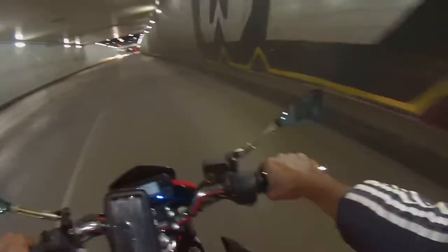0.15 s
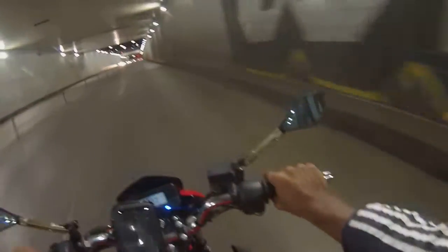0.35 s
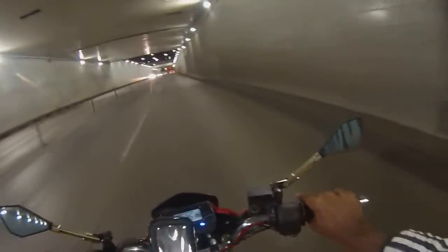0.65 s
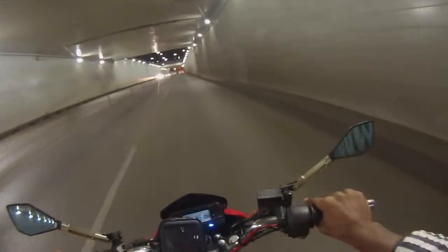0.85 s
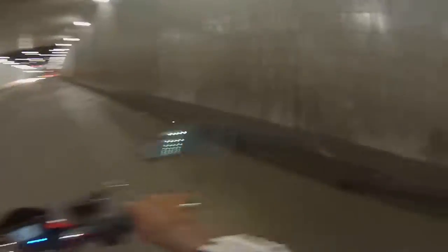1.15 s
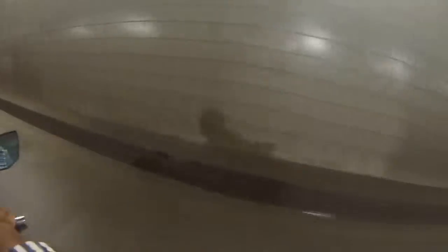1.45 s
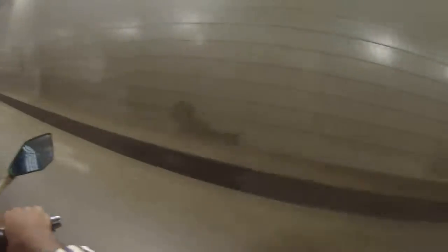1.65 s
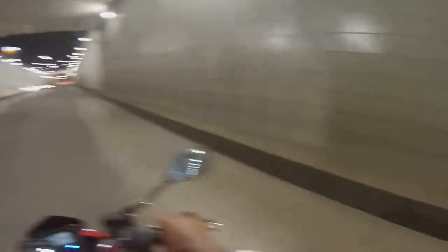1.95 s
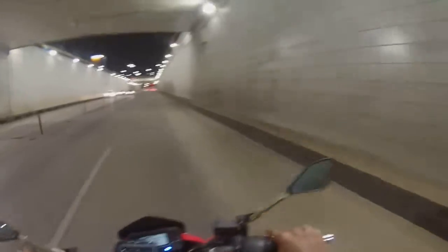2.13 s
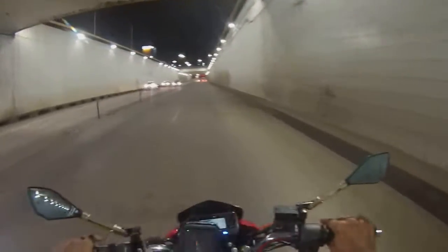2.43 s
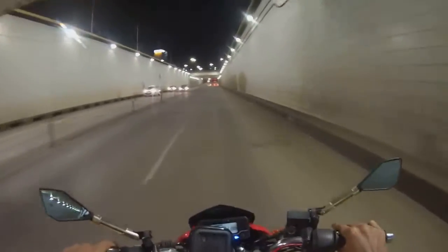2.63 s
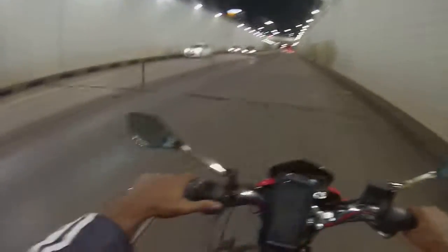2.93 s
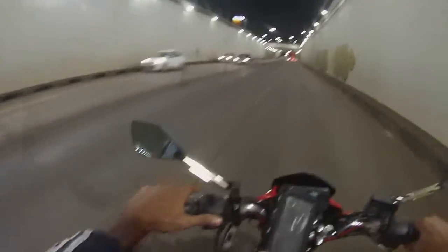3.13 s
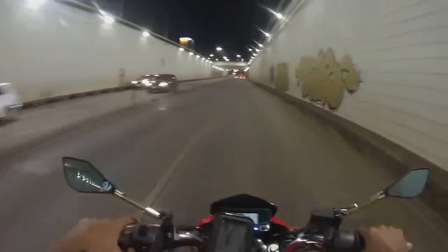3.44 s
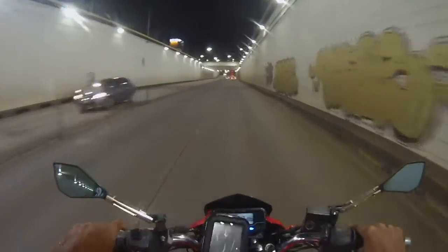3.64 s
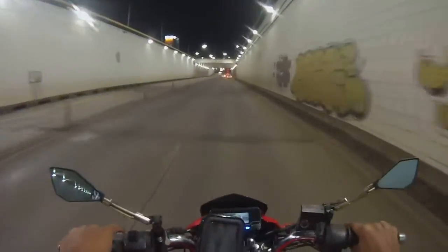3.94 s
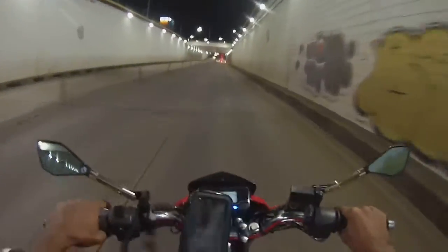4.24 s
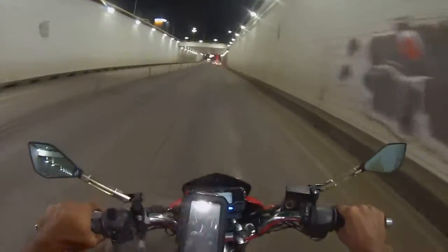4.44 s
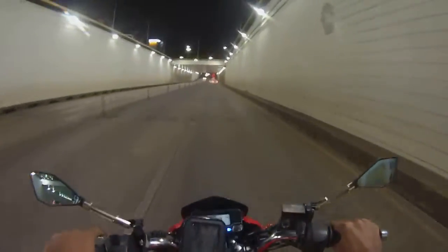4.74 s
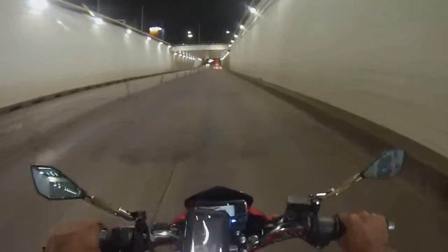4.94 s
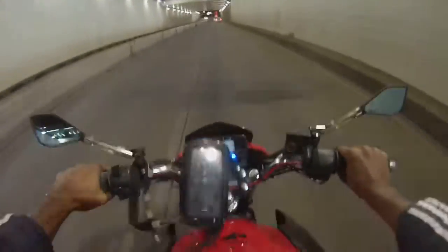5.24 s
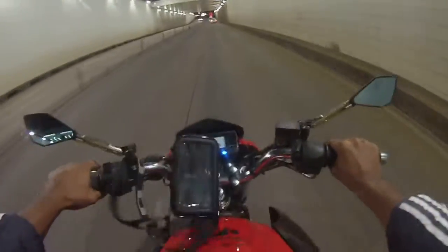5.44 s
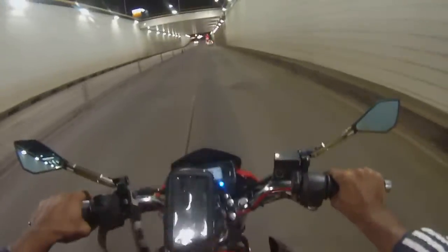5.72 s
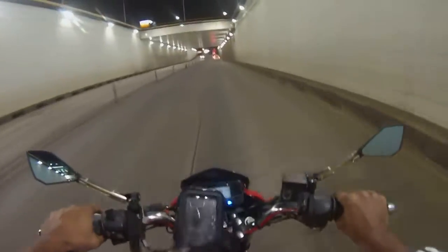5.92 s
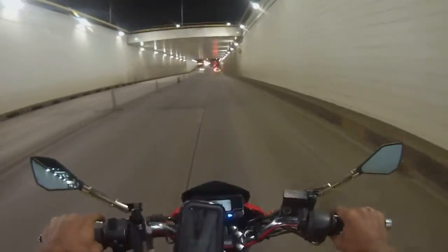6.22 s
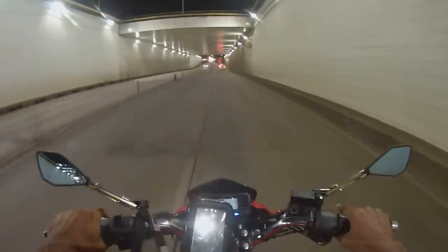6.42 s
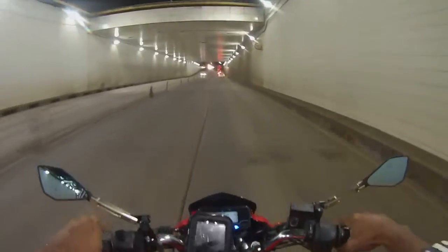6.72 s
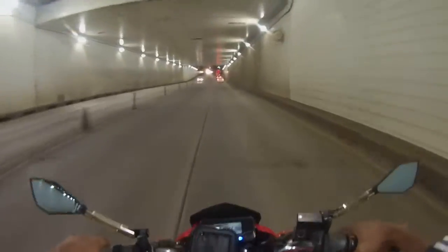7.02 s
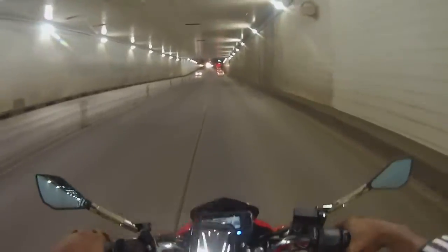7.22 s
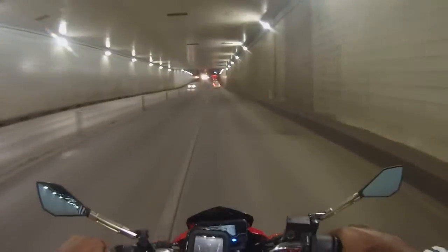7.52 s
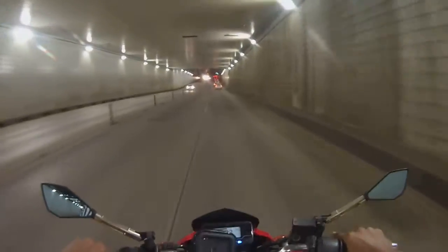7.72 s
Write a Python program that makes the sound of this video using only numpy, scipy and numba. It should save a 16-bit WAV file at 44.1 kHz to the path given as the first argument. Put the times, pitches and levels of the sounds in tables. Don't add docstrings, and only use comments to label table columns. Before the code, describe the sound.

Close, muffled motorcycle ride between tunnel walls: first a buzzing rev that swells and sinks within two seconds, then a low chugging cruise with uneven firings and smeared wall echoes. Low wind roar surges and flutters, covering the engine at times. Faint metallic rattle and gear whine fade as the throttle eases. Loud beats make the level dip with tiny clicks.

```python
import sys
import numpy as np
from scipy import signal
from scipy.io import wavfile
from scipy.ndimage import uniform_filter1d
from numba import njit

SR = 44100
rng = np.random.default_rng(int(sys.argv[2]) if len(sys.argv) > 2 else 0)


def int16_out(signal):
    q = np.round(np.clip(np.atleast_2d(signal).T, -1, 1) * 32767)
    wavfile.write(sys.argv[1], SR, q.astype(np.int16))


def boost(x):
    u = np.asarray(x, float) / 20
    return 10 ** u


N = 347067

# start_s, firing_hz
FIRING_RATE = [(0.0, 48.1), (0.33, 39.5), (0.46, 49.6), (0.65, 68.3), (0.76, 77.45), (0.81, 79.0),
               (1.29, 79.4), (1.4, 76.2), (1.6, 66.35), (1.71, 59.8), (1.93, 41.6), (1.99, 43.2),
               (2.15, 43.0), (2.26, 40.4), (5.5, 45.25), (6.7, 46.6), (7.55, 44.5), (7.87, 44.75)]
# start_s, stair_click_db, slow_duck_db
STRONG_FIRINGS = [(0.0001, -42, -3), (0.0672, -40.5, -1.5), (0.1556, -44, -3), (0.391, -46, 0.1),
                  (0.9025, -44, -1.6), (1.9041, -43, -6.5), (2.2727, -44.5, -2.7), (2.6894, -39, -6),
                  (2.855, -41.5, -7), (3.523, -40, -0.3), (3.7145, -40.5, -5), (4.0639, -43, -4.5),
                  (4.1828, -45.5, -3.5), (4.5627, -42.5, -3), (4.8466, -41.5, -1), (5.1354, -38.5, -0.3),
                  (5.2254, -35, 6), (5.4285, -36.5, 5.5), (5.511, -55, -3.5), (5.7526, -43, 0),
                  (5.8433, -43, 3.7), (5.973, -41.5, 5.3), (6.1921, -43.5, -1.5), (6.6663, -43.5, -4.5),
                  (6.8655, -42.5, -2.5), (7.0429, -45.5, -1.7), (7.132, -42, -5), (7.3065, -46.5, 1.5),
                  (7.839, -40.5, -3), (7.868, -59, -1.6)]


def curve(table):
    s, *columns = np.transpose(table)
    return [np.interp(np.arange(N) / SR, s, column) for column in columns]


def level(x, db):
    return x * boost(db) / np.sqrt(np.mean(x ** 2))


@njit
def svf(x, hz, width_hz):
    y, band, low = np.empty(len(x)), 0., 0.
    for i in range(len(x)):
        g, k = np.tan(np.pi * hz[i] / SR), width_hz / hz[i]
        v = (band + g * (x[i] - low)) / (1 + g * (g + k))
        band = 2 * v - band
        low = low + 2 * g * v
        y[i] = k * v
    return y


def modes(x, table):
    total = 0
    for hz, width_hz, db in table:
        centre_hz = np.full(len(x), 1. * hz)
        once = svf(x, centre_hz, 1.276 * width_hz)
        total = total + boost(db) * svf(once, centre_hz, 1.276 * width_hz)
    return total


def walk(rate_hz):
    hold = int(SR / rate_hz)
    held = np.repeat(rng.standard_normal(N // hold + 1), hold)
    return uniform_filter1d(uniform_filter1d(held, hold), hold)[:N]


def wind(roar_db, buffet_db, rush_db):
    # hz, db_per_hz
    turbulence = [(12, -44), (20, -14), (43, -34.5), (81, -4), (162, 1.5), (195, -1.5), (264, -1),
                  (430, 1.5), (473, -4.5), (560, -22), (801, -52.5), (1610, -68), (1800, -50), (2340, -80),
                  (3960, -120)]
    hz_at, db_at = np.transpose(turbulence)
    roar, rush, gust = 0, 0, walk(6)
    for hz in 50 * 2 ** np.arange(0, 4.8, 1 / 3):
        db = np.interp(np.log(hz), np.log(hz_at), db_at) + 0.86 * gust + 2.9 * walk(15)
        band = boost(db) * modes(rng.standard_normal(N), [(hz, hz / 5.13, 0)])
        if hz < 560:
            roar = roar + band
        else:
            rush = rush + band
    buffet_band = signal.butter(2, [22, 70], "band", fs=SR, output="sos")
    buffet = signal.sosfilt(buffet_band, rng.standard_normal(N)) * boost(3.1 * gust)
    rush = rush * boost(1.3 * gust + .7 * walk(8))
    return level(roar, roar_db) + level(buffet, buffet_db) + level(rush, rush_db)


def thumps():
    thump_s, thump_per_duck = 0.036, 1.5
    t = np.arange(N) / SR
    swell_db = np.zeros(N)
    for s, _, duck_db in STRONG_FIRINGS:
        swell_db -= thump_per_duck * min(duck_db, 0) * np.exp(-((t - s + thump_s / 2) / thump_s) ** 2)
    return swell_db


def mechanics(turns, buzz_db, rattle_db):
    # start_s, level_db
    gear_whine = [
        (0, -22),
        (2, -18),
        (2.4, -14.5),
        (4, -8.5),
        (6.6, -11),
        (6.9, -24),
        (7.87, -25),
    ]
    # hz, width_hz, level_db
    casing = [(1176, 1400, 1.5), (1550, 390, -3), (1970, 360, -2.5), (2180, 120, -15)]
    # hz, width_hz, level_db
    valve_gear = [(4130, 970, 5), (4550, 2300, 3.5), (6140, 3000, -7.5), (7700, 100, -7), (9400, 5800, -19),
                  (11040, 850, -11.5)]
    puff = boost(1.5 * np.cos(2 * np.pi * turns - .6) + 1.9 * walk(50))
    taps = boost(2.0 * rng.exponential(size=N)) * (rng.random(N) < .3) * rng.standard_normal(N)
    revved = boost(0.58 * (curve(FIRING_RATE)[0] - 85))
    loaded = boost(curve(gear_whine)[0])
    buzz = level(modes(puff * rng.standard_normal(N), casing), 0)
    buzz = buzz + revved * level(modes(taps, [(2170, 48, 0)]), -8)
    rattle = level(modes(puff * taps, valve_gear), 0)
    high_revs = modes(taps, [(4300, 290, -2.5), (4800, 410, -3), (8500, 130, -11.5)])
    rattle = rattle + revved * level(high_revs, -1.1)
    whine = loaded * level(modes(puff * taps, [(5310, 200, 0)]), -2) * boost(3 * walk(10))
    return buzz * boost(buzz_db) + (rattle + whine) * boost(rattle_db)


def through_case(x):
    hollow_hz, top_hz = (2370, 3770), 12800
    x = x - 0.84 * svf(x, np.full(N, 1800.), 300.0)
    hollow = signal.sosfilt(signal.butter(2, hollow_hz, "bandstop", fs=SR, output="sos"), x)
    return signal.sosfilt(signal.butter(8, top_hz, fs=SR, output="sos"), hollow + boost(-18.5) * x)


def walls(x):
    t60_s, nearest_s = 0.56, .012
    t = np.arange(int(SR * .8)) / SR
    tails = rng.standard_normal((2, len(t))) * boost(-60 * t / t60_s) * (t > nearest_s)
    fade = 1.5 * walk(4)
    wet = np.cos(fade) * signal.fftconvolve(x, tails[0])[:N]
    wet = wet + np.sin(fade) * signal.fftconvolve(x, tails[1])[:N]
    return np.interp(np.arange(N) - 30 * walk(3), np.arange(N), wet)


def exhaust(pulses):
    # hz, width_hz, level_db
    pipe = [(94, 37, -7), (189.5, 91, -3.5), (291.2, 67, -2.5), (428.8, 95, 1)]
    case_hz = 446
    return signal.sosfilt(signal.butter(4, case_hz, fs=SR, output="sos"), modes(pulses, pipe))


def unevenness(turns):
    wall_db = 4
    fired = np.flatnonzero(np.diff(np.floor(turns)))
    pulses = np.zeros(N)
    pulses[fired] = rng.standard_normal(len(fired))
    direct = exhaust(pulses)
    return level(level(direct, 0) + level(walls(direct), wall_db), 0)


def crank():
    turns = np.cumsum(curve(FIRING_RATE)[0]) / SR
    at = (np.array(STRONG_FIRINGS)[:, 0] * SR).astype(int)
    pull = np.zeros((2, N))
    pull[:, at] = np.cos(2 * np.pi * turns[at]), np.sin(2 * np.pi * turns[at])
    pull = uniform_filter1d(uniform_filter1d(pull, size=SR), size=SR)
    phase = np.unwrap(np.arctan2(pull[1], pull[0]))
    return turns - uniform_filter1d(phase, size=SR // 2) / (2 * np.pi)


def note(turns, load_db, boom_db, pull_db):
    # hz, level_db
    upper = [(40, -54), (80, -26), (230, 0.5), (340, -12), (395, -8), (455, 3.5), (495, -4.5), (540, -15.5),
             (650, -23.5), (850, -34), (1200, -62.5)]
    # hz, level_db
    lower = [(85, -27.5), (130, -25.5), (170, -21), (210, -20.5), (240, -24), (270, -24), (320, -25.5),
             (400, -24.5)]
    boom_hz, boom_width_hz = 165.6, 32
    pull_hz, pull_width_hz = 210, 26
    upper_db, upper_per_load = -28.5, 1.3
    even_db_per_hz, second_per_load = 0.1538, 1.4
    hz, out = curve(FIRING_RATE)[0], 0
    for k in range(1, 17):
        if 2 <= k <= 5:
            db = np.interp(k * hz, *np.transpose(lower))
            db = db + boom_db * np.exp(-((k * hz - boom_hz) / boom_width_hz) ** 2)
            db = db + pull_db * np.exp(-((k * hz - pull_hz) / pull_width_hz) ** 2)
        else:
            db = np.interp(k * hz, *np.transpose(upper))
            db = db + (k > 1) * (upper_db + upper_per_load * load_db)
        db = db + ((k == 4) + (k == 6) / 2) * even_db_per_hz * (hz - 44)
        db = db + (k == 2) * second_per_load * load_db
        lag = .08 * k * k + .2 * walk(4)
        waver_db = 1.1 * walk(6) + (k > 5) * 1.2 * walk(1.5)
        out = out + np.sqrt(2) * boost(db + waver_db) * np.cos(2 * np.pi * k * turns - lag)
    return out


def bangs(rest):
    swing_s, swing_hz = .0016, 270
    t = np.arange(-400, 400) / SR
    s, click_db, _ = np.transpose(STRONG_FIRINGS)
    at = ((s + .0008) * SR).astype(int)
    places, hits = np.zeros((2, N))
    places[at] = 1
    hits[at] = .45 * boost(.35 * (click_db + 50)) * rng.choice([1, 1, -1], len(s))
    bell = np.exp(-(t / swing_s) ** 2)
    share = np.clip(signal.fftconvolve(places, .8 * bell, "same"), 0, 1)
    swing = bell * np.cos(2 * np.pi * swing_hz * t + 0.53)
    return rest * (1 - share) + signal.fftconvolve(hits, swing, "same")


def scene():
    # start_s, engine_load_db, roof_and_wall_boom_db, throttle_pull_db, gust_db
    ride = [(0, -1, 4.5, -8, -1), (.3, -1, 5.5, -8, -5), (.45, 2.5, -3, -5.5, -2.5),
            (1.25, 4, -3.5, -4, -8.5), (1.6, 0, -5, 1.5, -9), (1.82, -3, 12, -12, -10),
            (2.05, 1, 1.1, -3, 1.5), (2.25, -1, -3, 3.5, -3.5), (2.7, 0.9, -5, 3.3, 9),
            (3.2, -4, -8.5, 1.5, 9), (4.3, -1.9, -7, 1.7, 2), (4.8, 2, -7, 0.5, -1.9),
            (5.2, 2.5, 0.5, -2.1, 3), (5.65, -0.5, -2, -5.5, -5.5), (6.1, 0, -3.3, -2, 0.5),
            (6.7, -0.1, -2.5, 0.5, 6), (6.95, -3.5, 7, -11.5, 3), (7.87, -5, 0.5, -13, 3.5)]
    uneven_db, roar_db, buffet_db, rush_db, buzz_db, rattle_db = -21.5, -18.5, -32, -43, -52, -61
    rattle_lag_s = .22
    load_db, boom_db, pull_db, gust_db = curve(ride)
    turns = crank()
    revs_hz = curve(FIRING_RATE)[0] - 44
    engine = note(turns, load_db, boom_db, pull_db) + unevenness(turns) * boost(uneven_db + .3 * load_db)
    roar_db = roar_db - 0.064 * revs_hz + .15 * gust_db
    thump_db = thumps()
    air = wind(roar_db, buffet_db + gust_db + thump_db, rush_db + .7 * gust_db + .3 * thump_db)
    late_load_db = np.interp(np.arange(N) - rattle_lag_s * SR, np.arange(N), load_db)
    rattle_db = rattle_db + 0.64 * late_load_db + .06 * revs_hz
    low = bangs(engine + air)
    return (low + through_case(mechanics(turns, buzz_db + 0.72 * load_db, rattle_db)))[None]


def gain_control(x):
    trip_level, high_level = .45, 0.55
    duck_wait_s, duck_fall_s, duck_back_s = .007, 0.0041, 0.075
    stairs, stair_samples, stair_back_s = 4, 16, 0.078
    catch_per_s = 40

    def back(v, tau_s):
        return signal.lfilter([1], [1, -np.exp(-1 / (tau_s * SR))], v)

    s, click_db, duck_db = np.transpose(STRONG_FIRINGS)
    at = (s * SR).astype(int) + 14
    first, ducks, steps = np.zeros((3, N))
    ducks[np.minimum(at + int(duck_wait_s * SR), N - 1)] = duck_db
    slow_db = back(back(ducks, duck_back_s), duck_fall_s) / (duck_fall_s * SR)
    swing = abs(x) * boost(slow_db)
    high = signal.find_peaks(swing, height=high_level, distance=SR // 70)[0]
    first[high] = np.minimum(0.15 + 2.4 * (swing[high] - high_level), .33)
    chance = rng.random(N // 800 + 1).repeat(800)[:N]
    first *= chance < (catch_per_s / curve(FIRING_RATE)[0]) ** 2
    for start in at:
        first[start - 200:start + 200] = 0
    first[at] = .29 * boost(click_db + 48.0)
    for k in range(stairs):
        steps -= np.roll(first * (.47 + rng.random(N)) * .67 ** k, k * stair_samples)
    steps[signal.find_peaks(swing, height=trip_level)[0]] -= .15
    steps = uniform_filter1d(steps, size=2)
    gain_db = back(steps, stair_back_s) + slow_db
    return gain_db - gain_db.mean()


def band_limit(x):
    return signal.sosfilt(signal.butter(12, 14900, fs=SR, output="sos"), x)


def record(dry):
    x = np.tanh(0.82 * dry * boost(gain_control(dry[0]))) / 0.82
    x = x + level(np.diff(rng.standard_normal(N + 1)), -80)
    edge = signal.sosfiltfilt(signal.butter(12, 12000, fs=SR, output="sos"), x)
    mix = edge + boost(-15.5) * (x - edge)
    return band_limit(mix)


dry = scene()
out = record(dry)
int16_out(out)
```